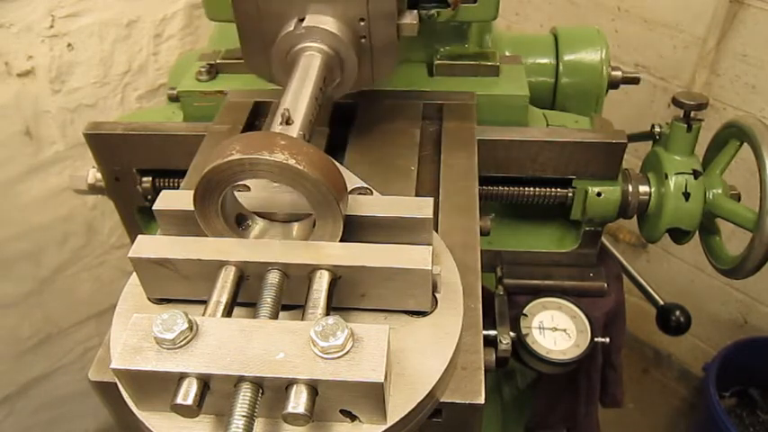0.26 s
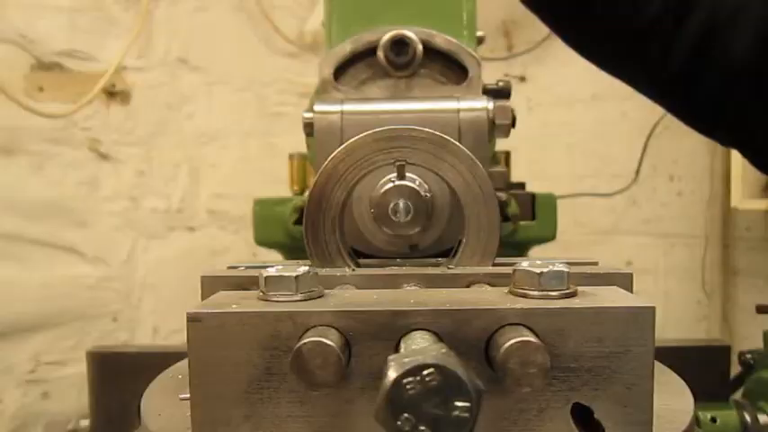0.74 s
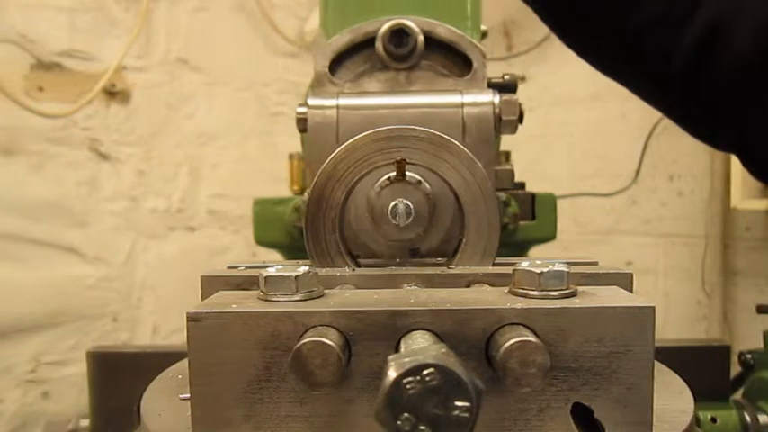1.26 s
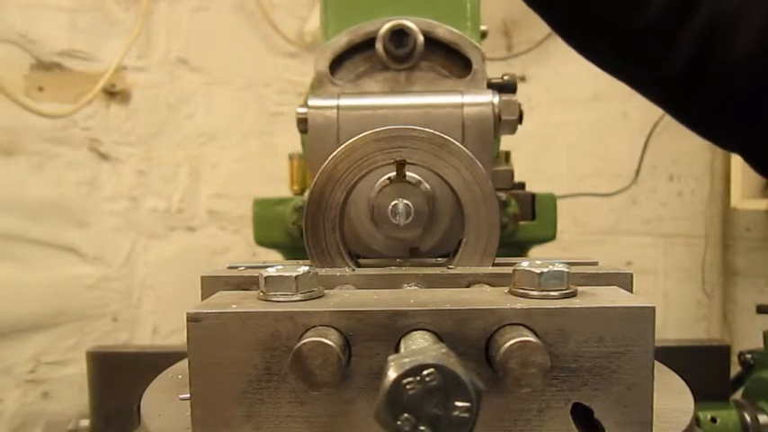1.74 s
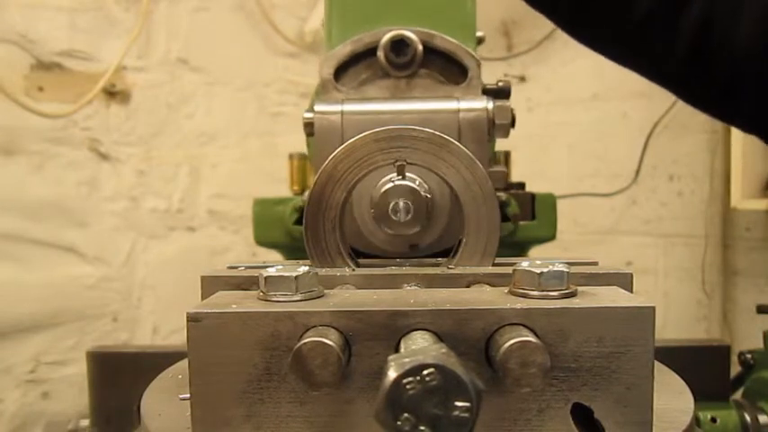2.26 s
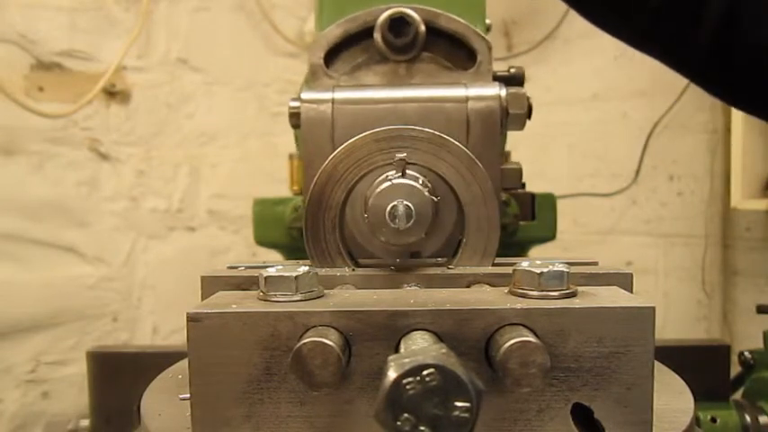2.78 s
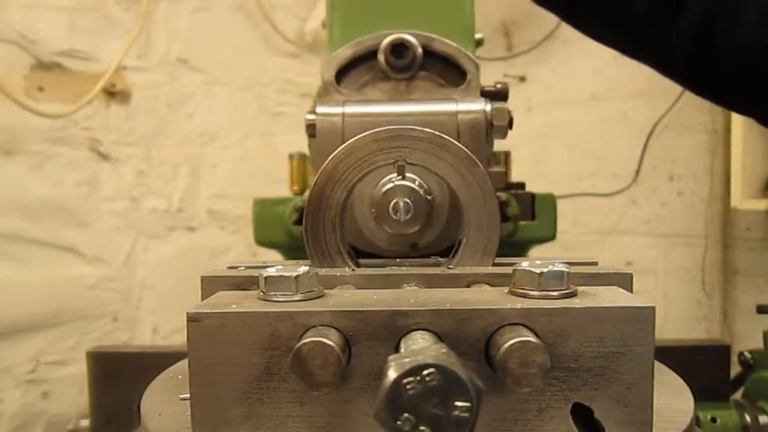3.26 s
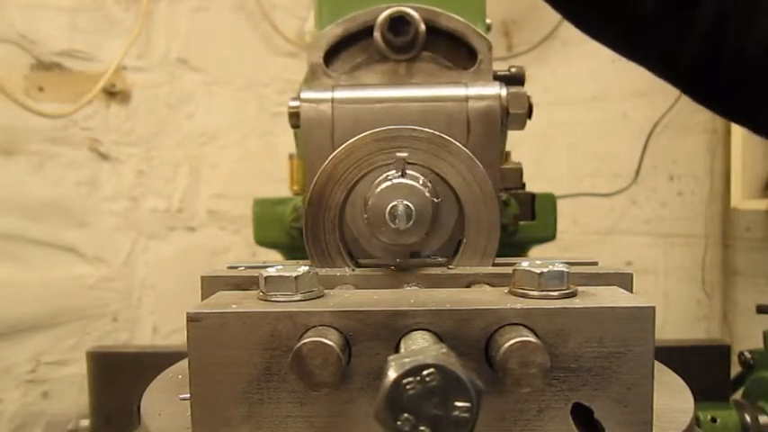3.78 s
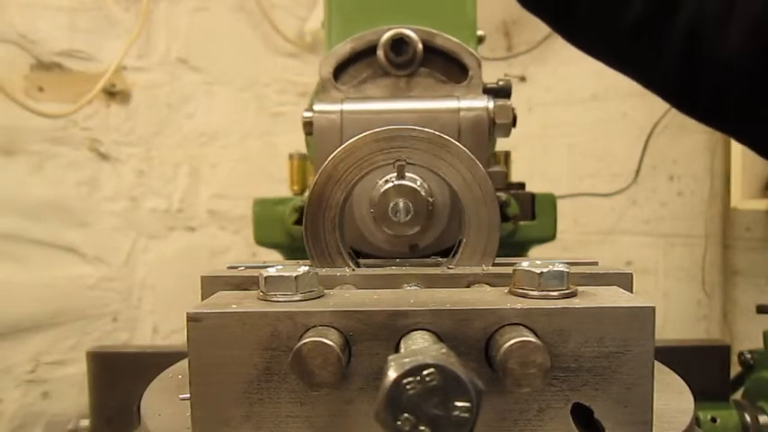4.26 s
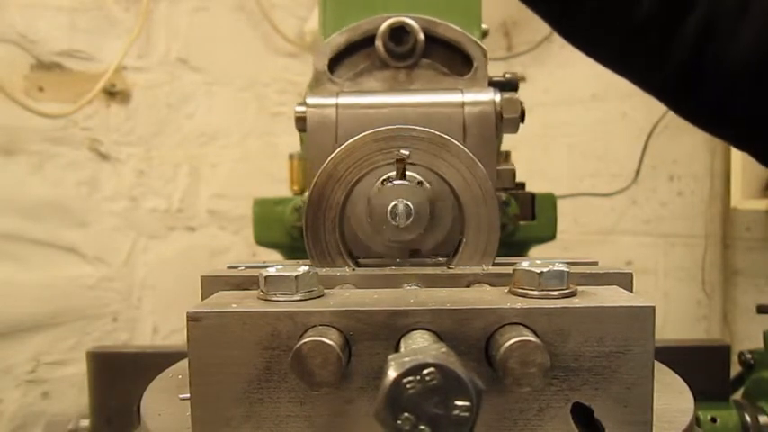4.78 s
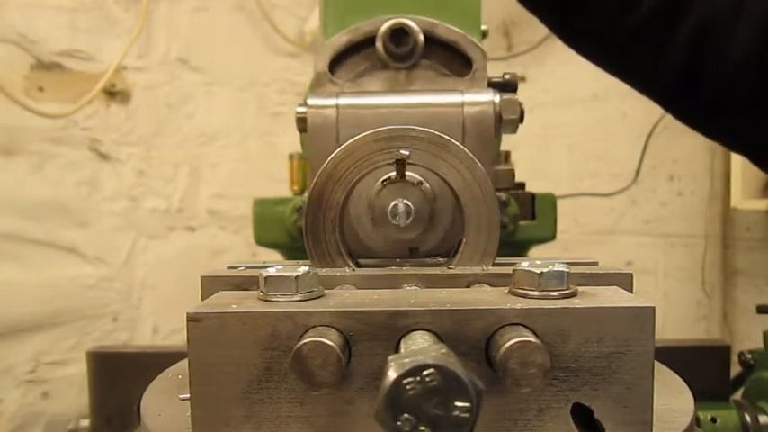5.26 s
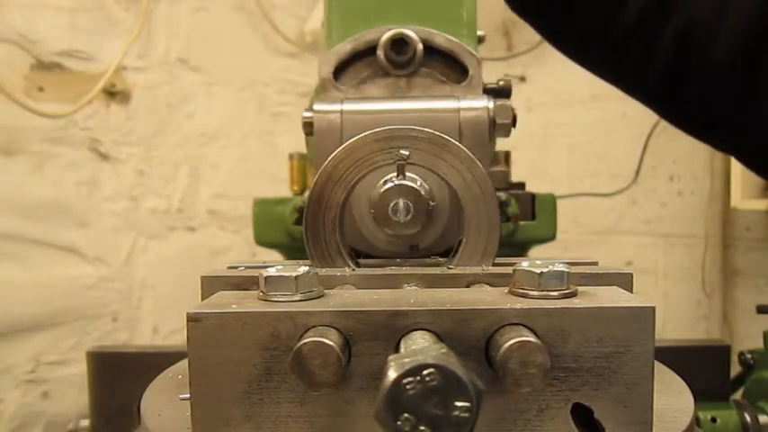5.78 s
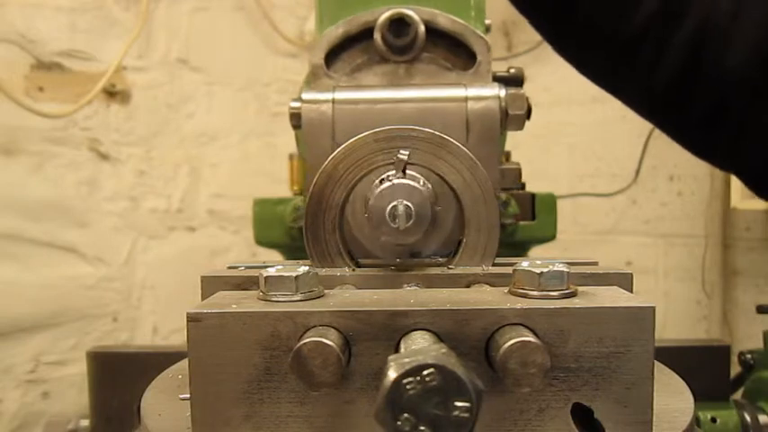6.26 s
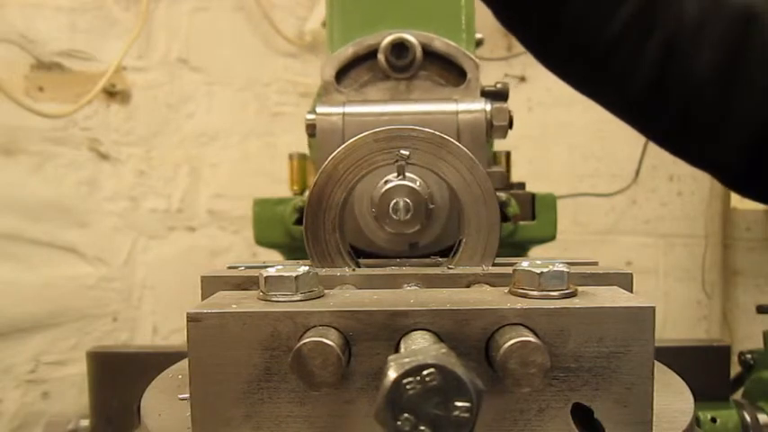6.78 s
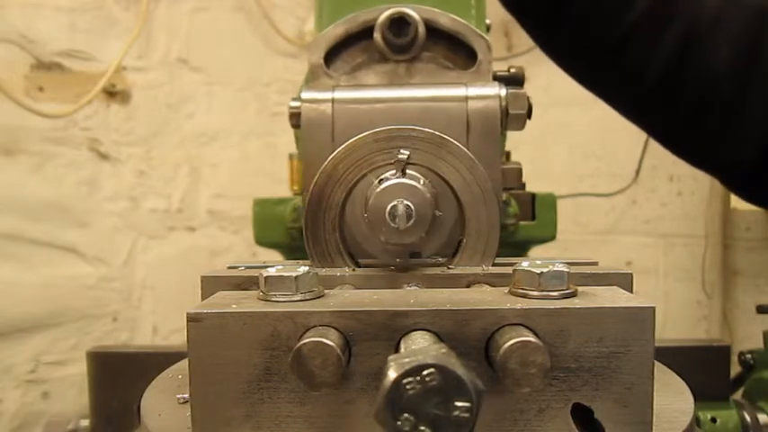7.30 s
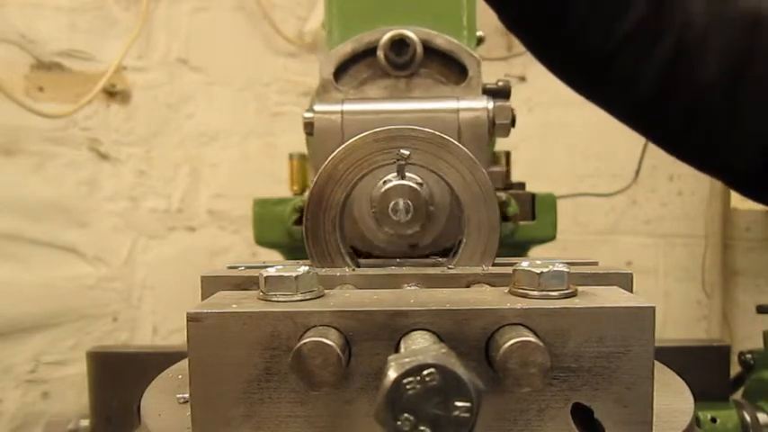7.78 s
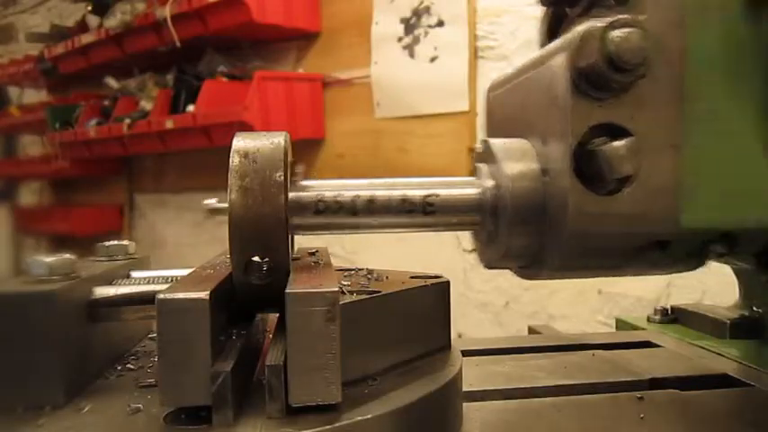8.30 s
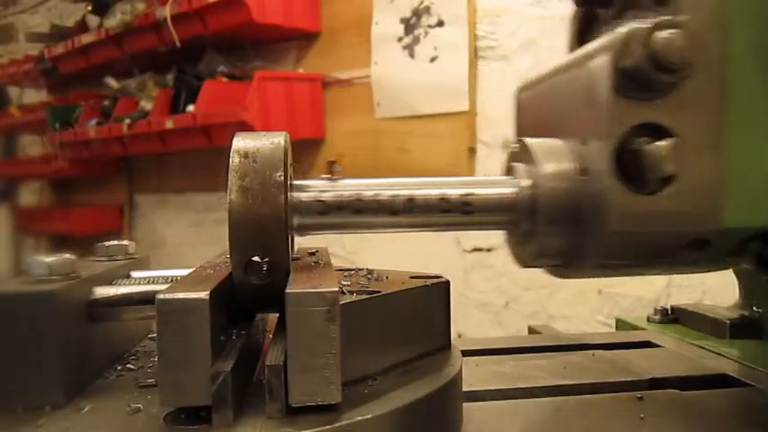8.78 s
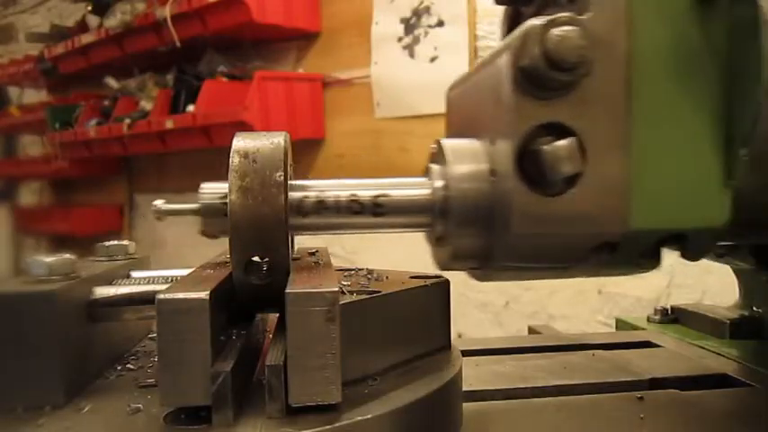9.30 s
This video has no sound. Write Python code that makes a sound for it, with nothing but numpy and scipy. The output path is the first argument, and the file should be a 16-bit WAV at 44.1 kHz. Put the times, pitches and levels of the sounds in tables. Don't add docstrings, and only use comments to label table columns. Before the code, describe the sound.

Continuous buzzing motor and gears, mid-low and slightly wavering, with a short chattering scrape at the start. After an abrupt cut, steady strokes follow: clack, gritty rasp, snap, faint metallic ringing, a return rub ending in a light tink. Near the end the view moves to the side, the hum thins and the strokes become softer. Close microphone, short room reverberation, dull top end.

```python
import sys
import numpy as np
from scipy import signal
from scipy.fft import rfft, irfft, next_fast_len
from scipy.io import wavfile
from scipy.ndimage import uniform_filter1d

SR = 44100
rng = np.random.default_rng(int(sys.argv[2]) if len(sys.argv) > 2 else 0)


def master(y):
    cut = np.clip(np.atleast_2d(y).T, -1, 1)
    pcm = np.round(cut * 32767)
    wavfile.write(sys.argv[1], SR, pcm.astype(np.int16))


def magnitude_from_level(level_db):
    exponent = np.asarray(level_db, float) / 20
    return 10 ** exponent


N = 420713
STROKE_S, CUT_S = .8805, .126


def drive():
    whine, turn = gear_whine()
    hum = shaft_hum()
    knocks = tooth_knocks(turn)
    rumble = bearing_rumble()
    return drone_level() * (whine + hum + knocks + rumble)


# multiple, level_db
MESH_ORDERS = [(1, -31), (2, -7.5), (3, 1.5), (4, -6), (9, -19), (11, -16)]


def gear_whine():
    mesh_hz = 81.75 * (1 + .008 * drift(3))
    whine, turn = orders(MESH_ORDERS, mesh_hz, flicker_db=2.5, fourth_db=crank(axis=4))
    return magnitude_from_level(crank(axis=2)) * whine, turn


# multiple, level_db
SHAFT_ORDERS = [(7, -19.5), (8, -24.5), (10, -14), (24, -17.5), (26, -15), (32, -17.5), (35, -19),
                (38, -22), (39, -18), (41, -13.5), (42, -22), (48, -35.5), (49, -22.5)]
SHOT_HUM_DB = [4, 0.5, 4]


def shaft_hum():
    hum = orders(SHAFT_ORDERS, np.full(N, 12.5), flicker_db=3.5)[0]
    viewpoint_db = np.array(SHOT_HUM_DB)[shot(clock())]
    return magnitude_from_level(crank(axis=3) + viewpoint_db + 9.0) * hum


FRAME_HZ = [128, 252, 318, 400, 490, 612, 736, 897, 996, 1300, 1779]
# width_hz, level_db
FRAME = [(24, -12.5), (33.4, 4), (33.3, 1.5), (22, -13.5), (49, -3), (28.4, -14), (22, -17.5), (26.1, -1),
         (22, -4.5), (30, -17.5), (13.8, -11)]


def tooth_knocks(turn):
    teeth = np.diff(np.floor(turn / (2 * np.pi)), prepend=0)
    teeth = teeth * magnitude_from_level(4.0 * rng.standard_normal(N))
    rattle = 0.18 * grains(400, spread_db=6.5)
    return magnitude_from_level(-4.5) * resonances(teeth + rattle, FRAME_HZ, FRAME)


# pitch_hz, level_db per Hz
RUMBLE = [(18, -60.5), (30, -31.5), (114, -12.5), (194, -15), (247, -10.5), (328, -8.5), (359, -15.5),
          (498, -17.5), (649, -20), (902, -23.5), (1120, -26.5), (1340, -29.5), (5700, -47), (7410, -77),
          (12500, -120)]


def bearing_rumble():
    noise = colour(rng.standard_normal(N), RUMBLE)
    return magnitude_from_level(-4.5) * noise * magnitude_from_level(2.43 * drift(4.2))


def drone_level():
    return magnitude_from_level(slowly(axis=1) + crank(axis=1) + gain_db())


# start_s, drone_db, ram_sliding_db
DRONE = [(0, -24, 3.2), (.3, -21.5, 4.7), (.56, -25, -2.5), (.62, -27, -2.5), (0.861, -25, 7),
         (1.4, -25, 2.7), (2.3, -26.5, 0.5), (3.2, -25, -2.5), (4.1, -26.5, 0), (4.9, -23.5, 1.5),
         (5.8, -25, -3), (6.7, -24.5, 0.5), (7.6, -26.5, 1.5), (7.9, -24, 5.5), (8.0, -24, -7.5),
         (8.6, -25, 1), (9.1, -24.5, -4), (9.54, -19.5, 0.5)]


def slowly(axis):
    table = np.array(DRONE)
    return np.interp(clock(), table[:, 0], table[:, axis])


# after_bite_s, drone_db, gear_load_db, shaft_hum_db, fourth_gear_tone_db (relative)
CRANK = [
    (0, -3.5, 1, -4, -3),
    (.12, 3.5, -8, -14, 5.7),
    (.22, 0.5, -26, -13, 8.5),
    (.32, 0.5, -6.5, -8, 6.5),
    (.42, -0.5, -0.5, -12.5, -1.2),
    (.54, 1.5, -5.5, -14, 8),
    (.66, 0, -18.5, -8, -0.5),
    (.78, 1.5, -5.5, -10.5, 6),
    (.88, -0.5, 2.5, -8.5, -6),
]


def crank(axis):
    table, bite_s = np.array(CRANK), np.array(SHOTS)[shot(clock()), 1]
    phase = (clock() - bite_s) % STROKE_S
    return np.interp(phase, table[:, 0], table[:, axis])


# start_s, bite_before_s
SHOTS = [
    (0, -.28),
    (.572, -.002),
    (7.972, 7.4425),
]


def shot(t):
    return np.searchsorted(np.array(SHOTS)[:, 0], t, side="right") - 1


# bite_s, bite_db, exit_db
DUCKS = [(0, 8, -0.3), (0.8774, 15.5, 1.5), (1.7576, 16, 2), (2.6396, 8.5, 8.5), (3.522, 12, 6.5),
         (4.398, 9, 2.5), (5.2796, 9, 17), (6.16, 16, 13.5), (7.0419, 6, 10), (8.3228, 7, -2),
         (9.2055, 5.5, 2.8)]


def gain_db():
    duck_s, recover_s = 0.0099, 0.21
    bite_s, bite_db, exit_db = np.transpose(DUCKS)
    drops = np.full(N, 1e-18)
    drops[(bite_s * SR).astype(int)] = -bite_db
    drops[((bite_s + CUT_S) * SR).astype(int)] = -exit_db
    back = signal.lfilter([1], [1, -np.exp(-1 / (recover_s * SR))], drops)
    width = int(duck_s * SR)
    return uniform_filter1d(back, width, origin=(width - 1) // 2)


# pitch_hz, level_db per Hz
CHIP = [(290, -55.5), (500, -6), (1140, -15), (1330, -6), (1660, -10), (2020, -11), (3130, -12),
        (4030, -17.5), (5700, -24), (7410, -52), (12500, -120)]
# pitch_hz, level_db per Hz
SLIDE = [(530, -46.5), (900, -0.5), (1190, -18), (1360, 4), (1610, -9), (2290, -6.5), (4030, -20),
         (5700, -27), (7410, -53), (12500, -120)]


def tool():
    push, ring = push_and_ring()
    tearing = scrape(3200, CHIP, broad_db=3.0)
    cut = push * magnitude_from_level(2.0) * tearing
    drags, slide = rub()
    rubbing = magnitude_from_level(-5.5) * scrape(5000, SLIDE, broad_db=3.0)
    drag = (ring + drags + slide) * rubbing + drags * magnitude_from_level(-8) * tearing
    friction = cut + drag + work_ringing(cut + .6 * drag) + skid()
    return friction + bites() + snaps() + tinks() + catches() + sings()


# bite_s, level_db, growth_db (through the cut)
CUTS = [(0.8764, -36, 4), (1.7605, -42, 8.5), (2.6383, -31, 2.5), (3.5213, -29.5, -4),
        (4.4007, -29.5, -1.5), (5.279, -29, -2.7), (6.16, -35, 2.8), (7.0428, -29, -2.5),
        (7.9214, -28.5, 0.5), (8.3235, -40.5, 4.5), (9.2032, -36.5, -1)]


def push_and_ring():
    t, push, ring = clock(), np.zeros(N), np.zeros(N)
    for bite_s, db, growth_db in CUTS:
        since, heard = t - bite_s, shot(t) == shot(bite_s)
        edges = np.clip(np.minimum(since - .003, CUT_S + .004 - since) / .004, 0, 1)
        push += heard * edges * magnitude_from_level(db + growth_db * np.clip(since / CUT_S, 0, 1))
        decay_db = -4 - 94.5 * np.abs(since - CUT_S)
        ring += heard * (since > CUT_S) * magnitude_from_level(db + growth_db + decay_db)
    return push, ring


# drop_s, level_db, length_s
DRAGS = [(0.134, -30.5, 0.14), (0.57, -34.5, .13), (1.299, -26, 0.08), (2.16, -26.5, 0.078),
         (3.042, -25, 0.059), (3.927, -24, 0.062), (4.81, -25, 0.078), (5.703, -30, 0.092),
         (6.576, -27.5, 0.067), (7.451, -26.5, 0.058), (8.715, -28, 0.09), (9.479, -42, .06)]


def rub():
    touch_db_per_s, drop_db_per_s, growth_db = 256.5, 601, 7
    t, drags = clock(), 0
    for drop_s, db, length in DRAGS:
        onset = np.maximum(touch_db_per_s * (drop_s - length - t), 0)
        release = np.maximum(drop_db_per_s * (t - drop_s), 0)
        growth = growth_db * np.clip((drop_s - .015 - t) / length, 0, 1)
        drags = drags + (shot(t) == shot(drop_s)) * magnitude_from_level(db - onset - release - growth)
    slide_db = -42 + slowly(axis=2) + 1.1 * gain_db() + 0.95 * drift(7.3)
    return drags, magnitude_from_level(slide_db)


BAR_HZ = [1293, 1362, 1590, 1922, 2049, 2206, 2350, 2575, 3060, 3133, 3380, 3730, 4350, 4950, 5200, 5720]
# width_hz, level_db
BAR = [(18, -12.5), (24.9, 13.5), (16.1, 8), (30, 11.5), (29.8, 3.5), (14, -8), (60, 4), (35, -18),
       (52.3, -0.5), (30, -9), (49, -30.5), (50, -7), (150, -18), (45, -30.5), (94, -12.5), (80, -23.5)]


def scrape(per_s, broad, broad_db):
    slips = grains(per_s, spread_db=3.5)
    mixture = resonances(slips, BAR_HZ, BAR) + magnitude_from_level(broad_db) * colour(slips, broad)
    return rms_one(mixture) * magnitude_from_level(1.5 * drift(35))


# pitch_hz, width_hz, level_db
RINGS = [(1362, 14, -3), (2206, 9, -3), (3070, 25, -11), (2049, 14, -5), (1293, 12, -4)]


def work_ringing(force):
    modes = np.transpose(RINGS)
    excitation = force * rng.choice([-1, 1], N)
    return magnitude_from_level(-40.5 + .35 * gain_db()) * resonances(excitation, modes[0], modes[1:].T)


# start_s, level_db
SKID = [
    (0.015, -40),
    (0.03, -28.5),
    (0.086, -27.5),
    (0.131, -36),
    (0.141, -45),
]
SKID_HZ = [790, 1960, 2170, 3220]
# width_hz, level_db
SKID_PEAKS = [(80, 1), (150, -1.5), (25, -1), (200, -10)]


def skid():
    level_db = np.interp(clock(), *np.transpose(SKID), left=-90, right=-90)
    return magnitude_from_level(level_db) * resonances(grains(5000, spread_db=5.0), SKID_HZ, SKID_PEAKS)


# start_s, peak_db
BITES = [(.8784, -15), (1.7586, -15), (2.6389, -17), (3.5199, -15), (4.3999, -17), (5.2809, -18),
         (6.1619, -18), (7.0419, -15), (7.9226, -17), (8.3228, -21), (9.2035, -22)]
# pitch_hz, level_db, t60_s
BITE_MODES = [(1050, -9, .012), (1370, -9, .03), (1850, -3, .01), (3050, -4, .006), (3400, -16, .04),
              (4500, -12, .005), (5600, -14, .004)]


def bites():
    return blows(BITES, BITE_MODES, crack_db=2.5, crack_s=.0012, bounce_db=-6.5)


# start_s, peak_db
SNAPS = [(1.0041, -20), (1.8828, -20), (2.7656, -22), (3.6436, -22), (4.5256, -27), (5.4061, -20),
         (6.2873, -27), (7.1665, -17), (8.6833, -27.5), (8.7126, -26.5), (8.7304, -36), (9.4434, -41)]
# pitch_hz, level_db, t60_s
SNAP_MODES = [(1362, -14, .06), (2206, -28, .3), (3080, -8, .03), (5050, -12, .02)]


def snaps():
    return blows(SNAPS, SNAP_MODES, crack_db=1, crack_s=.002, bounce_db=-8)


# start_s, peak_db
TINKS = [(0.19, -38), (1.293, -31.5), (2.1735, -33), (3.0535, -24.5), (3.937, -26), (4.4118, -27),
         (4.5511, -39.5), (4.816, -29.5), (5.697, -29), (6.5792, -28.5), (7.4584, -25)]
# pitch_hz, level_db, t60_s
TINK_MODES = [(3994, 1, .05), (4060, -8, .02), (4005, -23, .22), (5450, -8, .01)]


def tinks():
    return blows(TINKS, TINK_MODES, crack_db=1, crack_s=0.002, bounce_db=-27.5)


# start_s, peak_db
CATCHES = [(1.275, -29), (2.105, -37), (2.165, -21), (3.035, -29), (3.925, -28), (4.755, -29), (4.785, -30),
           (5.69, -35), (6.537, -31), (6.562, -24), (7.445, -33), (8.435, -38)]


def catches():
    return blows(CATCHES, BITE_MODES, crack_db=4, crack_s=0.0022, bounce_db=-6)


# start_s, peak_db
SINGS = [(1.0, -41), (1.88, -39), (2.72, -40), (2.762, -34), (3.64, -42), (4.52, -43), (5.4, -43),
         (6.285, -40), (7.16, -48), (3.05, -41), (4.82, -39), (7.45, -43)]
# pitch_hz, level_db, t60_s
SING_MODES = [(2206, 0, .4), (2222, -8, .2)]


def sings():
    return blows(SINGS, SING_MODES, crack_db=-30, crack_s=.002, bounce_db=-25)


def blows(events, modes, crack_db, crack_s, bounce_db):
    start_s, db = np.transpose(events)
    at = (start_s * SR).astype(int)
    scatter_db, out = rng.normal(0, 2, (len(at), len(modes))), np.zeros(N)
    clicks = np.full(N, 1e-18)
    for k, (hz, mode_db, t60) in enumerate(modes):
        clicks[at] = magnitude_from_level(db + mode_db + scatter_db[:, k])
        r, w = magnitude_from_level(-60 / (t60 * SR)), 2 * np.pi * hz / SR
        out += signal.lfilter([0, np.sin(w)], [1, -2 * r * np.cos(w), r * r], clicks)
    clicks[at] = magnitude_from_level(db + crack_db)
    envelope = signal.lfilter([1], [1, -np.exp(-1 / (crack_s * SR))], clicks)
    spit = rng.standard_normal(N) * envelope
    band = signal.butter(1, [800, 6000], "band", fs=SR, output="sos")
    out += signal.sosfilt(band, spit + 6 * clicks)
    return out + magnitude_from_level(bounce_db) * np.roll(out, int(.0042 * SR))


def workshop(x, t60, wet_db):
    t = np.arange(int(.3 * SR)) / SR
    tail = rng.standard_normal(len(t)) * magnitude_from_level(-60 * t / t60) * (t > .006)
    tail = tail / np.sqrt(np.sum(tail ** 2))
    return x + magnitude_from_level(wet_db) * signal.fftconvolve(x, tail)[:N]


def air_hiss():
    band = signal.butter(1, [1500, 5000], "band", fs=SR, output="sos")
    return magnitude_from_level(-45.0) * signal.sosfilt(band, rng.standard_normal(N))


def orders(table, hz, flicker_db, fourth_db=0):
    turn = 2 * np.pi * np.cumsum(hz) / SR
    out = 0
    for k, db in table:
        level_db = db + (k == 4) * fourth_db + flicker_db * drift(8.9)
        out = out + np.sqrt(2) * magnitude_from_level(level_db) * np.sin(k * turn + rng.uniform(0, 7.25))
    return out, turn


def resonances(x, pitches_hz, peaks):
    out = 0
    for k, (hz, (width, db)) in enumerate(zip(pitches_hz, peaks)):
        r, w = np.exp(-np.pi * width / SR), 2 * np.pi * hz / SR
        mode = signal.lfilter([1 - r, 0, r - 1], [1, -2 * r * np.cos(w), r * r], x)
        out = out + (-1) ** k * magnitude_from_level(db) * mode
    return rms_one(out)


def grains(per_s, spread_db):
    sizes = magnitude_from_level(spread_db * np.minimum(rng.exponential(1, N), 4)) * rng.choice([-1, 1], N)
    return sizes * (rng.random(N) < per_s / SR) + 1e-18


def colour(x, spectrum):
    hz, db = np.transpose(spectrum)
    size = next_fast_len(N)
    bin_hz = np.arange(size // 2 + 1) * SR / size
    level_db = np.interp(np.log(np.clip(bin_hz, 1, 5700)), np.log(hz), db)
    shaped = irfft(rfft(x, size) * magnitude_from_level(level_db), size)[:N]
    return rms_one(signal.sosfilt(signal.butter(4, 7500, fs=SR, output="sos"), shaped))


def drift(rate):
    r = np.exp(-80 * np.pi * rate / SR)
    slow = signal.lfilter([1], [1, -2 * r, r * r], rng.standard_normal(N // 40 + 2002))[2000:]
    return np.interp(np.arange(N) / 40, np.arange(len(slow)), rms_one(slow))


def rms_one(x):
    return x / np.sqrt(np.mean(x ** 2) + 1e-20)


def clock():
    return np.arange(N) / SR


# pitch_hz, share_lost (of 1)
SIDE_DIPS = [(326, .5), (122, .4), (400, .4)]


def scene():
    drone, side = drive(), np.arange(N) > 7.95 * SR
    lost = 0
    for hz, share in SIDE_DIPS:
        lost = lost + share * signal.lfilter(*signal.iirpeak(hz, 12, fs=SR), drone)
    return (drone - side * lost + workshop(tool(), t60=0.25, wet_db=-11.0) + air_hiss())[None]


# start_s, step_db
EDITS = [(.5103, -62), (.521, -60), (.5265, -52), (.5316, -33), (.537, -60), (.5425, -60), (.5478, -56),
         (.5717, -36), (7.9155, -56), (7.9317, -27), (7.9355, -48), (7.9717, -43), (8.3265, -42)]


def scene_change_steps():
    start_s, step_db = np.transpose(EDITS)
    steps = np.zeros(N)
    steps[(start_s * SR).astype(int)] = magnitude_from_level(step_db + 4)
    return 0.95 * (steps + np.roll(steps, 1))


def low_pass(x):
    return signal.sosfilt(signal.butter(12, 15800, fs=SR, output="sos"), x)


def record(dry):
    x = signal.sosfilt(signal.butter(4, 76, "high", fs=SR, output="sos"), dry)
    lowpass = signal.cheby2(12, 70, 7293, fs=SR, output="sos")
    x = signal.sosfilt(lowpass, 0.31 * np.tanh(x / 0.37))
    band = signal.butter(2, [15, 60], "band", fs=SR, output="sos")
    wander = rms_one(signal.sosfilt(band, rng.standard_normal(N)))
    bias = -.004 - drone_level() * (0.034 + magnitude_from_level(-34.5) * wander)
    close = np.clip((N - np.arange(N)) / (.004 * SR), 0, 1)
    x = (x + scene_change_steps() + bias) * np.sin(close * np.pi / 2) ** 2
    mix = x + magnitude_from_level(-98) * rng.standard_normal(N)
    return low_pass(mix)


dry = scene()
out = record(dry)
master(out)
```